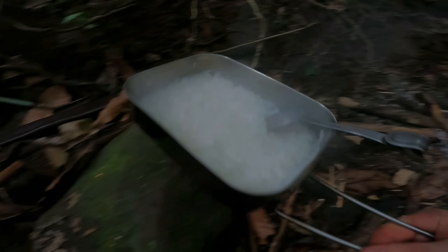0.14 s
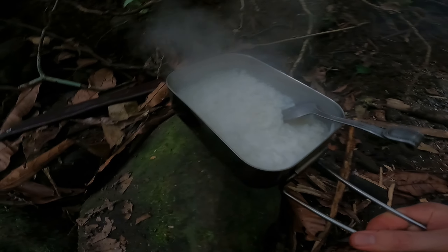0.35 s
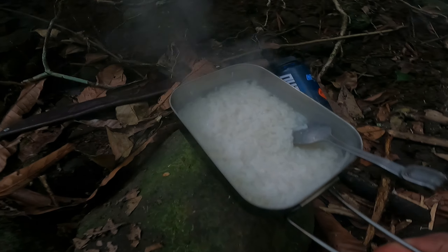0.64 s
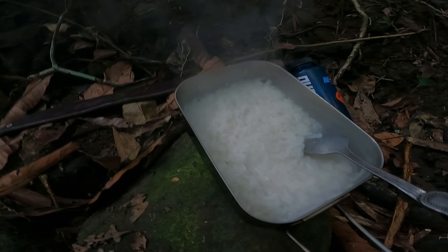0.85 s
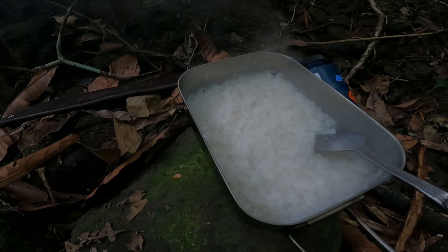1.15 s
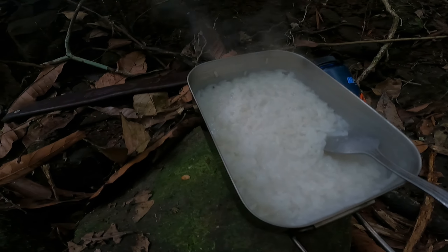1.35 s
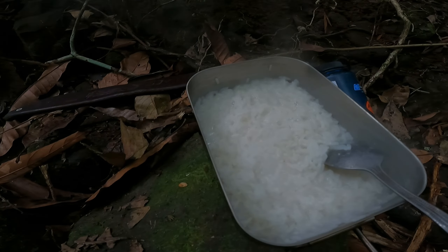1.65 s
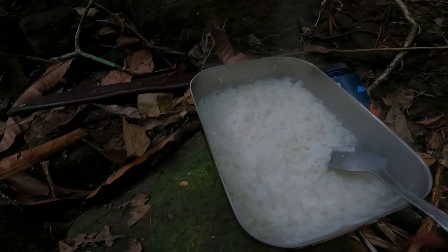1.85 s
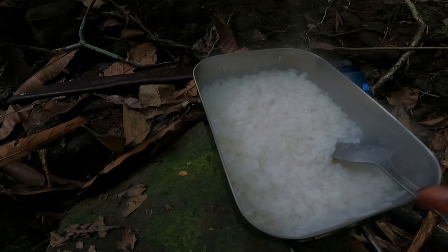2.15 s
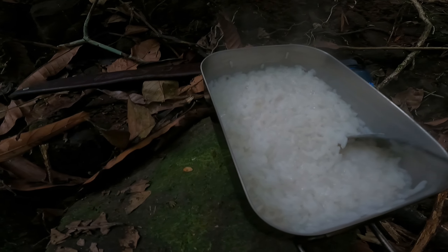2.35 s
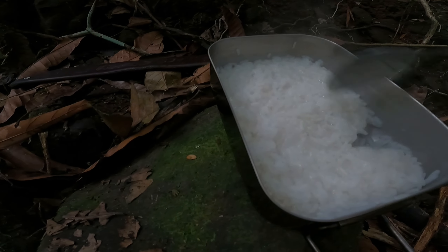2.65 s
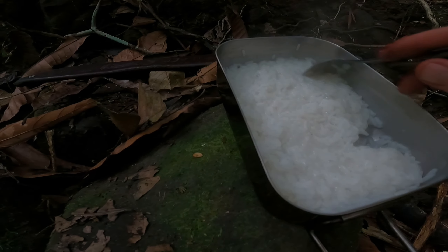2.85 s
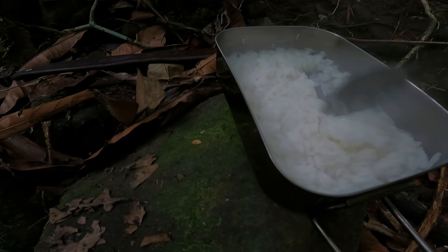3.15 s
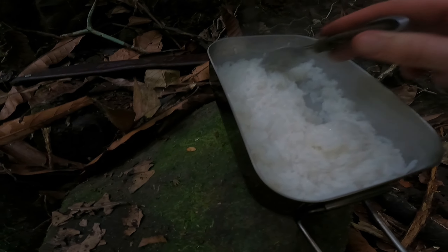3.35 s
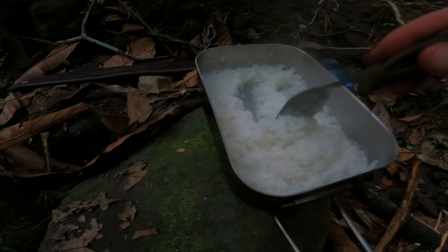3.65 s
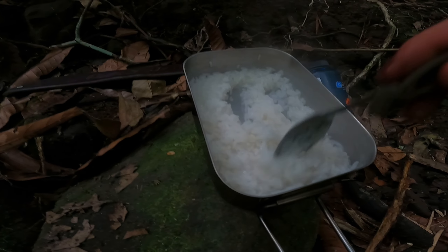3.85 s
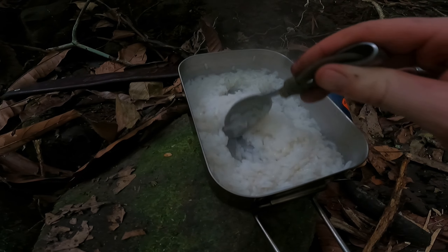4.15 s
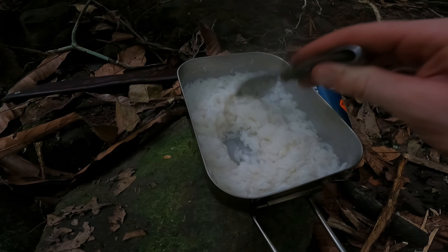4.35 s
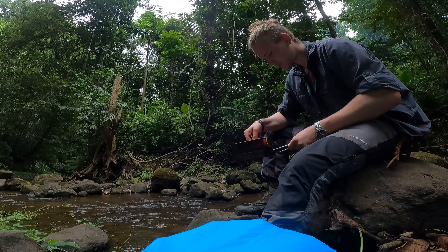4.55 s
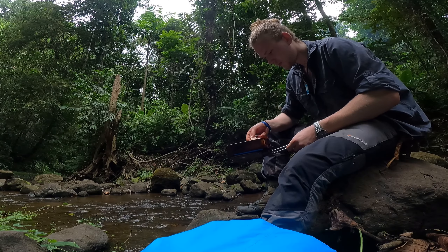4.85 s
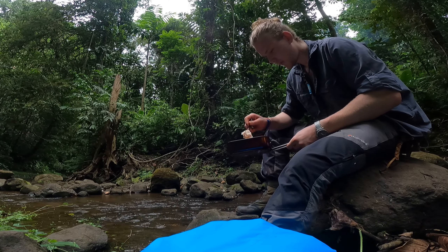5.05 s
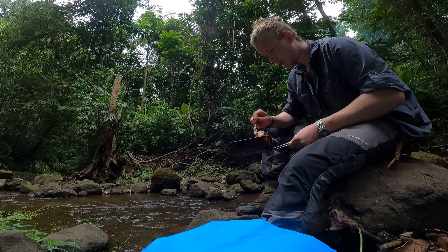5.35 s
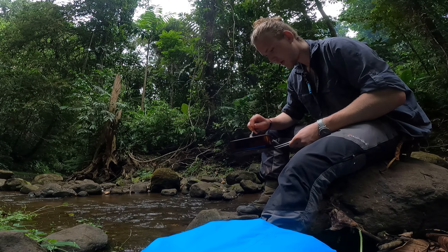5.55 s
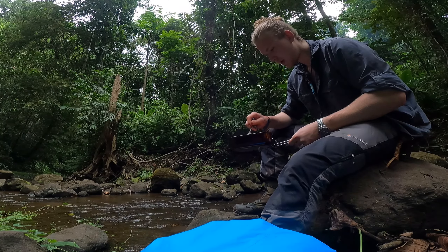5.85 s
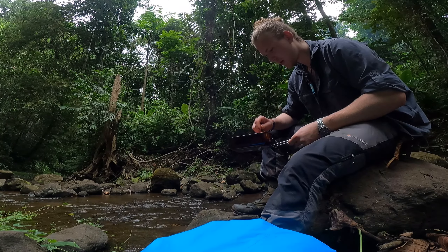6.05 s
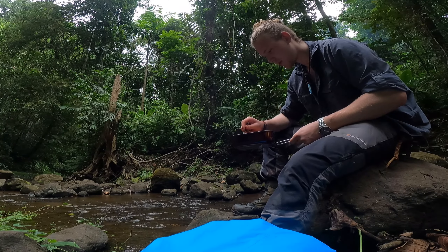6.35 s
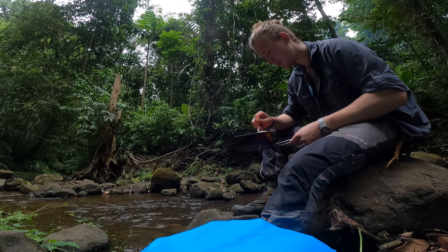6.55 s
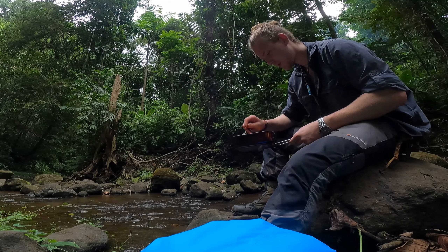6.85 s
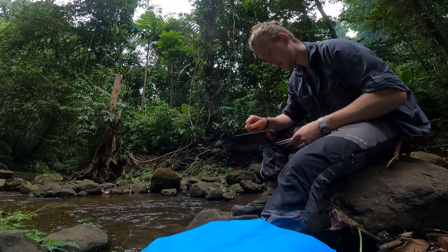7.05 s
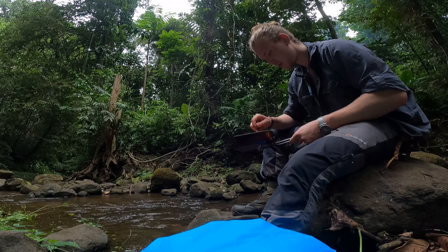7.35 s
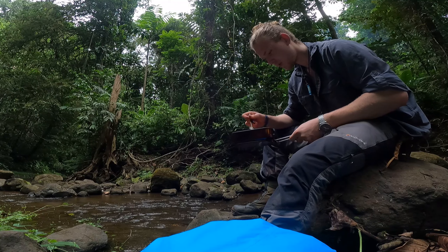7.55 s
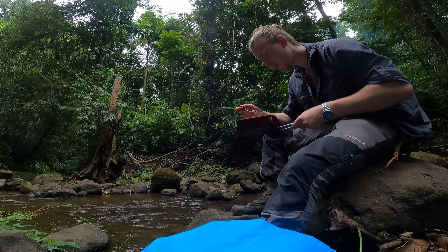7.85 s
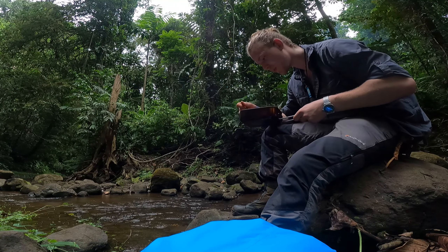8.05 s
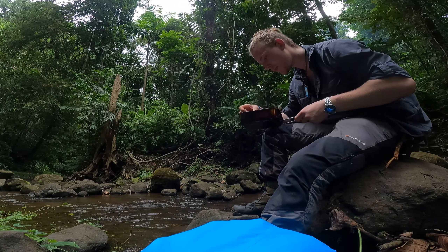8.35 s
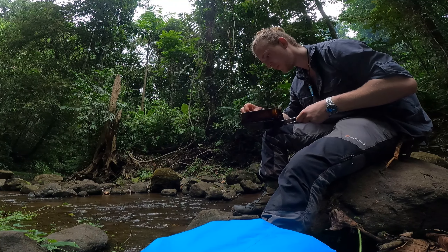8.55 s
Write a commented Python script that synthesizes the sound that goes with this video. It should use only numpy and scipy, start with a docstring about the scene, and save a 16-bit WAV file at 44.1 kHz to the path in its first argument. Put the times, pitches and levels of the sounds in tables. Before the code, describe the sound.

A spoon taps and scrapes through rice in a metal tin, over buzzing rainforest insects and later a softly bubbling brook.

```python
"""A rainforest, heard first from close by, then from across a brook. A spoon taps and scrapes through
rice in a hand-held metal tin: blows and small slips ring the tin's modes, and close by the hand passes
on a rumble. Insects buzz in a chorus, one rasps in bursts, a cricket throbs and a bird whistles, all as
noise in narrow resonances. Bubbles ring in the brook over a wash of leaves, water and far insects."""
import sys
import numpy as np
from scipy import signal
from scipy.io import wavfile
from scipy.ndimage import uniform_filter1d

SR = 44100
rng = np.random.default_rng(int(sys.argv[2]) if len(sys.argv) > 2 else 0)


def waveform_to_disk(signal):
    """Save audio, clipped to [-1, 1], as 16-bit WAV at the path in sys.argv[1]."""
    frames = np.transpose(np.atleast_2d(signal))
    scaled = np.clip(frames, -1, 1) * 32767
    samples = np.round(scaled).astype(np.int16)
    wavfile.write(sys.argv[1], SR, samples)


N = 384111
MOVE_S = 4.54  # close place to distant place

# Each row: start in seconds, clank peak in dB, favoured pitch in Hz, brightness in dB per octave,
# thud level in dB, chatter decay in seconds, base ring T60 in seconds.
SPOON_TAPS = [(0.025, -33, 5500, 13, -59, 0.0027, .04), (0.042, -31.5, 5500, 16, -57, 0.0036, .04),
              (0.076, -38, 5800, 6, -66, 0.0028, .04), (0.1214, -32, 1500, 9, -58, 0.0037, 0.12),
              (0.2297, -38, 2110, -3, -66, 0.0029, .06), (0.407, -25, 750, -10, -46, 0.0031, 0.047),
              (0.644, -39, 1100, 3, -64, .003, .04), (0.6737, -19.5, 497, -10, -39, 0.004, 0.092),
              (0.6824, -14, 4100, -1.5, -40.5, 0.0076, 0.11),
              (0.8243, -15.5, 690, -21.5, -31, 0.0086, 0.035),
              (0.859, -16.5, 4270, -12, -40.5, 0.0066, 0.069),
              (1.188, -35.5, 1360, -14, -55.5, 0.0072, 0.066),
              (1.2085, -23.5, 1920, -13, -62, 0.0044, 0.074), (1.3602, -33, 590, -10, -45, 0.011, .05),
              (1.6228, -25.5, 1820, -8, -42, 0.0072, 0.064),
              (1.6513, -27.5, 1950, -16.5, -46, 0.0087, 0.062),
              (1.7405, -36.5, 500, -19, -45.5, 0.0033, .05), (1.796, -54, 500, -5, -56, 0.0036, .04),
              (2.102, -39.5, 2000, 22, -84, 0.0023, 0.033), (2.2395, -15, 4300, -0.5, -46.5, 0.0093, 0.2),
              (2.2929, -27, 1290, 2, -59, 0.0092, 0.044), (2.4501, -18.5, 1300, 10.5, -51, 0.0095, 0.11),
              (2.9275, -15, 1000, -4, -35.5, 0.01, 0.07), (2.9835, -29, 614, -6, -64, .003, .04),
              (3.472, -6.5, 950, -1.5, -36, 0.0052, .05), (3.618, -20.5, 1330, 3, -66, 0.011, 0.071),
              (3.742, -31.5, 594, -25, -56, 0.0062, 0.028), (3.7779, -30.5, 503, -6, -41, 0.003, 0.081),
              (3.851, -27.5, 1830, 6.5, -70, .003, 0.045), (3.9028, -43, 515, -12, -46.5, 0.018, 0.02),
              (4.059, -8.5, 630, -0.5, -28.5, 0.0026, 0.044), (4.4992, -6, 2440, 5.5, -42, .003, 0.062),
              (4.7036, -13.5, 1250, 0, -52, 0.0045, 0.19), (4.865, -30, 1230, 3.5, -72, 0.0063, 0.12),
              (5.3414, -7.5, 1030, -2, -32.5, 0.0049, .14), (5.5699, -10, 996, 6, -35, 0.0089, 0.042),
              (5.6497, -26, 696, -17, -41, 0.0068, 0.026), (5.6567, -24, 690, -4, -49, 0.0049, 0.11),
              (5.719, -31.5, 715, -10, -50, 0.0084, 0.044), (5.928, -22, 960, -1.5, -48, 0.0052, 0.031),
              (6.1681, -15.5, 1070, -4.5, -59, 0.0087, 0.15)]
# Each row: frequency in Hz, level in dB, multiple of the base T60.
TIN_MODES = [(215, -23, 0.47), (302, -25, 0.43), (474, -2.5, 1.4), (647, 3, 1.68), (1007, -5.5, 0.57),
             (1040, 8.5, 1.18), (1303, 19.5, 0.4), (1670, 8, 1.1), (1927, 18, 0.64), (2283, 11.5, 0.4),
             (2560, 20, 0.28), (3130, 13.5, 0.27), (3690, 15.5, 0.26), (4285, 8.5, 0.39), (5260, 6.5, 0.36),
             (5840, -6, 0.76), (6390, -15, 2), (10500, -17, 0.12)]
# Each row: start, length, rise and fade in seconds, hold level in dB, favoured pitch in Hz,
# brightness in dB per octave.
SPOON_STROKES = [(0.0, 0.39, 0.0016, 0.39, -50.5, 1220, -6), (0.867, .23, 0.099, 0.095, -48.5, 650, -14),
                 (1.239, 0.19, 0.029, 0.046, -51, 400, -13.5), (1.737, 0.087, 0.0045, .08, -51, 413, -28),
                 (2.444, 0.11, 0.0044, 0.041, -43.5, 1470, -0.5),
                 (2.962, 0.22, 0.054, 0.032, -37.5, 2750, 11), (3.499, .197, .1, 0.0091, -39, 1620, 13.5),
                 (3.724, 0.076, 0.041, 0.021, -41, 500, -12), (4.091, 0.16, 0.065, 0.023, -40.5, 2640, 12),
                 (4.547, 0.18, 0.0066, 0.042, -48.5, 2480, 18.5),
                 (4.718, 0.16, 0.066, 0.07, -46.5, 1110, -4)]
# Each row: time in seconds, chorus level in dB.
CHORUS_LEVELS = [(0.0, -61), (4.51, -53), (4.7, -50), (8.71, -47.5)]
# Each row: centre in Hz, width in Hz, relative level in dB.
CHORUS_RESONANCES = [(5863, 430, 0), (6510, 1800, -4), (7330, 540, -1), (7610, 67, -6)]
# Each row: start in seconds, level in dB, nominal length in seconds.
RASP_BURSTS = [(0.504, -56.5, 0.41), (1.02, -57, 0.41), (1.714, -55, 0.63), (2.247, -53.5, 0.49),
               (3.095, -49.5, 0.38), (3.661, -50.5, 0.37), (4.359, -51, 0.16), (4.775, -49, 0.38),
               (7.926, -49, 0.38)]
# Each row: centre in Hz, width in Hz, relative level in dB, entry delay in seconds.
CLOSE_RASP_RESONANCES = [(8027, 98, -2.5, 0), (8420, 230, -4.5, 0.05), (10720, 552, -16.5, 0),
                         (11900, 690, -18.5, 0.053), (12950, 1200, -28, 0.016)]
DISTANT_RASP_RESONANCES = [(7340, 760, 8, 0.021), (8130, 530, -4, 0), (9900, 730, -3.5, 0.017),
                           (11500, 1300, -17.5, 0), (13500, 1100, -23, 0.014)]
# Each row: start in seconds, initial pitch in Hz, level in dB, length in seconds, sag limit as a share.
BIRD_CALLS = [(5.74, 2527, -51, 0.22, 0.13), (6.62, 2654, -48.5, 0.35, 0.25), (7.36, 1604, -52, .2, 0.17),
              (7.63, 2490, -59, 0.28, 0.25)]
# Each row: start in seconds, pitch in Hz, level in dB, length in seconds.
CLOSE_PEEPS = [(0.27, 4350, -75, .1), (0.565, 4450, -78, .07), (.86, 3400, -73, 0.32),
               (1.128, 4430, -69, 0.055), (1.283, 3030, -67.5, .35), (1.833, 4460, -64, 0.052),
               (2.849, 2210, -64, 0.072), (3.41, 2290, -64.5, 0.08), (3.957, 2260, -77, .09),
               (4.068, 2240, -51, 0.064), (4.325, 2230, -72, 0.079)]
# Each row: delay in seconds, gain in dB.
TREE_ECHOES = [(.05, -11.5), (.11, -9.5), (.18, -12)]
# Each row: start in seconds, level in dB, initial pitch in Hz.
LOUD_BUBBLES = [(5.081, -47, 2620), (6.119, -50, 975), (6.394, -47, 1350), (6.851, -51, 665),
                (7.169, -46.5, 1230), (7.75, -48.5, 1460), (8.316, -51, 1063), (8.427, -46.5, 1390),
                (8.633, -48, 973)]
# Each row: start in seconds, initial pitch in Hz, level in dB, decay time in seconds.
LOW_BUMPS = [(4.505, 227, -38.5, 0.027), (5.66, 136, -38, 0.058)]
# Each row: centre in seconds, level in dB, half-width in seconds.
HISS_SWELLS = [(1.395, -63.5, 0.088), (2.73, -62.5, 0.12)]
# Each row: frequency in Hz, relative spectral density of the forest in dB.
CLOSE_SPECTRUM = [(40, -43), (105, -56), (150, 0), (364, -14), (785, -20), (1200, -5.5), (4400, -13.5),
                  (7800, -14.5), (8600, -27.5), (12500, -45.5), (15500, -80)]
DISTANT_SPECTRUM = [(30, -12), (105, -64), (150, -3.5), (778, -10.5), (1200, -2.5), (3400, -6.5),
                    (5200, -9.5), (7800, -7.5), (8300, -23.5), (12500, -33), (15500, -63)]
# Each row: frequency in Hz, left-right correlation of the forest.
CLOSE_CORRELATION = [(60, 0.078), (240, 0.84), (950, 0.69), (3770, 0.98), (15000, 0.73)]
DISTANT_CORRELATION = [(60, 0.28), (240, 0.87), (950, 0.77), (3770, 0.46), (15000, 0.67)]
# Each row: frequency in Hz, forest level left over right in dB.
CLOSE_BALANCE = [(150, -2.5), (1000, 1.2), (12000, 4)]
DISTANT_BALANCE = [(150, -1.5), (1000, 0.61), (12000, 2.4)]


def tin_ring(t60_s, pitch_hz, bright_db, size, knock_db, spread_db, under_db, detune):
    """The tin after one click: dry knock, then weaker ring. The spot struck varies each mode."""
    hz, db, t60_scale = np.transpose(TIN_MODES)[:, :, None]
    t = np.arange(size) / SR
    spot = rng.standard_normal((len(TIN_MODES), 2))
    octaves = np.log2(hz / pitch_hz)
    favour_db = 7.5 * np.exp(-(octaves / .2) ** 2)  # counts twice in the ring
    db = db + bright_db * octaves + under_db * np.minimum(octaves, 0) + favour_db
    decay_db = 60 * t / (t60_s * t60_scale)
    fade = gain_of(favour_db - decay_db) + gain_of(knock_db - decay_db / 0.17)
    modes = np.sin(2 * np.pi * hz * (1 + detune * spot[:, 1:]) * t)
    return (gain_of(db + spread_db * spot[:, :1]) * fade * modes).sum(0)


def spoon_taps():
    """Each blow, a click plus brief contact chatter, rings the tin."""
    out, t = np.zeros((2, N)), np.arange(2000) / SR
    thud_hz, clank_hz = (110, 450), (450, 12500)
    for start_s, peak_db, pitch_hz, bright_db, thud_db, chatter_s, t60_s in SPOON_TAPS:
        force = 0.033 * rng.standard_normal((2, len(t))) ** 3 * np.exp(-t / chatter_s)
        force[1] = 0.74 * force[0] + 0.42 * force[1]
        force[:, 0] = 1  # the click
        ring = tin_ring(t60_s, pitch_hz, bright_db, size=6000,
                        knock_db=15.5, spread_db=4.5, under_db=4.5, detune=0.016)
        blow = signal.fftconvolve(force, ring[None], axes=1)
        clank, thud = band(blow, clank_hz), band(band(blow, thud_hz), thud_hz)
        clank *= gain_of(peak_db) / abs(clank).max()
        thud *= gain_of(thud_db) / thud[:, :900].std()
        add(out, start_s, clank + thud, pan_db=-2.2)
    return out


def rice_grit(size, pitch_hz, bright_db):
    """Clumped slips as the spoon passes six spots on the tin, each with its own colour."""
    wander = uniform_filter1d(rng.standard_normal((6, size)), size=1200)
    contact = gain_of(6.2 * unit_rms(uniform_filter1d(wander, size=1200)))
    out = 0
    for share in contact / np.linalg.norm(contact, axis=0):
        clumps_db = 4.56 * slow_noise(size, span=300)
        slips = rng.standard_normal((2, size)) * share
        slips *= gain_of(clumps_db + 2.4 * rng.exponential(1, size))
        slips[1] = 0.95 * slips[0] + 0.26 * slips[1]
        ring = tin_ring(0.053, pitch_hz * 2 ** rng.normal(0, 0.46), bright_db, size=2500,
                        knock_db=3.0, spread_db=8, under_db=2.5, detune=0.116)
        out = out + signal.fftconvolve(slips, ring[None] / np.linalg.norm(ring), axes=1)[:, :size]
    return out


def spoon_strokes():
    """The spoon drags through rice along the damped tin: rise, hold, release."""
    out, slack_db = np.zeros((2, N)), -11
    for start_s, length_s, rise_s, fade_s, db, pitch_hz, bright_db in SPOON_STROKES:
        t = np.arange(0, length_s, 1 / SR)
        slack = np.maximum(1 - t / rise_s, 0) + np.maximum(1 - (length_s - t) / fade_s, 0)
        drag = unit_rms(rice_grit(len(t), pitch_hz, bright_db)) * signal.windows.tukey(len(t), .04)
        add(out, start_s, gain_of(db + slack_db * slack) * drag, pan_db=-1.6)
    return out


def hand_rumble():
    """The hand shakes the close microphone and passes on each thud as a deep jolt."""
    t = np.arange(N) / SR
    jolt_db, jolt_s = -13, 0.033
    level = gain_of(-83.5 + 6.5 * slow_noise(N, span=5000))
    for start_s, _, _, _, thud_db, _, _ in SPOON_TAPS:
        first = round(start_s * SR)
        age_s = t[first:first + 8000] - start_s
        level[first:first + 8000] += gain_of(thud_db + jolt_db) * np.exp(-age_s / jolt_s)
    return level * unit_rms(band(band(stereo_noise(.9), (14, 55)), (14, 65)))


def insect_chorus(distant):
    """Clicks of many insects blur into a few noise bands."""
    buzz = sum(gain_of(db) * unit_rms(resonate(stereo_noise(0.69), hz, width_hz))
               for hz, width_hz, db in CHORUS_RESONANCES)
    buzz = signal.sosfilt(signal.ellip(6, 1, 40, (5600, 7950), "band", fs=SR, output="sos"), buzz)
    level_db = np.interp(np.arange(N) / SR, *np.transpose(CHORUS_LEVELS))
    pan_db = np.where(distant > .5, 3.2, 1.5)
    return gain_of(level_db + np.array([pan_db, -pan_db]) / 2) * unit_rms(buzz)


def insect_rasps(bursts, resonances, rise_s, pan_db, glide, glide_s):
    """One insect in bursts: resonances enter in turn, glide to pitch and trail off."""
    out, throb_hz = np.zeros((2, N)), 90
    for start_s, burst_db, length_s in bursts:
        t = np.arange(0, 2 * length_s, 1 / SR)
        throb = 1 + 0.12 * np.sin(2 * np.pi * (throb_hz * t + rng.random()))
        fade = np.exp(-(t / (0.42 * length_s)) ** 1.37)
        for hz, width_hz, db, entry_s in resonances:
            age_s = np.maximum(t - entry_s, 0)
            swell = gain_of(burst_db + db) * (1 - np.exp(-(age_s / rise_s) ** 2)) * fade
            pitch_hz = hz * (1 + glide * np.exp(-age_s / glide_s))
            direct, echo = resonate(rng.standard_normal((2, len(t))) * throb, pitch_hz, width_hz)
            add(out, start_s, swell * unit_rms(direct), pan_db)
            add(out, start_s, gain_of(-8) * swell * unit_rms(echo), pan_db=-14)  # trees on the right
    return out


def whistles(calls, width_hz, fade_db):
    """Near-sines, held or sagging in pitch, blurred and echoed by trees."""
    out, sag_s = np.zeros((2, N)), 0.199
    for start_s, hz, db, length_s, sag in calls:
        t = np.arange(0, length_s, 1 / SR)
        pitch_hz = hz * (1 - sag * (1 - np.exp(-t / sag_s)))
        direct, echo = resonate(rng.standard_normal((2, len(t))), pitch_hz, width_hz)
        swell = gain_of(db + fade_db * t / length_s) * signal.windows.tukey(len(t), .4)
        add(out, start_s, swell * unit_rms(direct), pan_db=1.5)
        for delay_s, echo_db in TREE_ECHOES:
            add(out, start_s + delay_s, gain_of(echo_db) * swell * unit_rms(echo), pan_db=-4)
    return out


def cricket():
    """A fuzzy tone in slightly uneven throbs."""
    t = np.arange(N) / SR
    throb_hz, phase_zero_s = 7.5, 4.6
    drift = slow_noise(N, span=6000)
    throb = 1 + 0.42 * np.cos(2 * np.pi * throb_hz * (t - phase_zero_s) + .5 * drift)
    tone = unit_rms(resonate(stereo_noise(0.68), hz=3990, width_hz=390))
    return gain_of(-58 + 1.2 * drift) * throb * tone


def bubble(hz, cycles):
    """A soft-edged tone that rises as the bubble nears the surface."""
    turns = np.arange(0, 3 * cycles, hz / SR)
    swell = 2 * (turns / cycles) * np.exp(1 - 1.58 * turns / cycles)
    return swell * np.sin(2 * np.pi * (turns + 0.0022 * turns ** 2))


def brook():
    """Small random bubbles plus a few loud ones."""
    out, rate_per_s = np.zeros((2, N)), 14
    for hz in np.geomspace(550, 2600, 16):
        levels = gain_of(-71 + 4.24 * np.minimum(rng.exponential(1, N), 3.5))
        onsets = rng.random(N) < rate_per_s / SR
        add(out, 0, signal.oaconvolve(levels * onsets, bubble(hz, cycles=3.9))[:N], pan_db=1.5)
    for start_s, db, hz in LOUD_BUBBLES:
        add(out, start_s, gain_of(db) * bubble(hz, cycles=12.7), pan_db=1.5)
    return out


def bumps():
    """Soft low tones that sink and die away."""
    out = np.zeros((2, N))
    for start_s, hz, db, decay_s in LOW_BUMPS:
        age = np.arange(0, 1.5, 1 / (SR * decay_s))
        swell = gain_of(db - 7.6 * age ** 2) * np.minimum(age / 0.055, 1)
        add(out, start_s, swell * np.sin(2 * np.pi * hz * decay_s * (age - 0.082 * age ** 2)))
    return out


def crackle():
    """Random ticks, thinning in the first second, over a growing hiss with brief swells."""
    t = np.arange(N) / SR
    rate_per_s, growth_db_per_s = 3 + 60 * np.exp(-t / .3), 3.5
    ticks = gain_of(-29.5 + 2.63 * rng.exponential(1, N)) * (rng.random(N) < rate_per_s / SR)
    swells = sum(gain_of(db) * np.exp(-((t - mid_s) / half_s) ** 2) for mid_s, db, half_s in HISS_SWELLS)
    hiss = unit_rms(band(stereo_noise(0.28), (2600, 7600)))
    hiss *= gain_of(-73 + growth_db_per_s * t) + swells
    return band(band(ticks, (500, 6500)), (400, 7500)) + hiss


def forest(spectrum, correlation, balance, level_db, patch_db):
    """Leaves, water and far insects: random short-time spectra with drifting patches."""
    frames, hz = N // 256 + 5, np.fft.rfftfreq(1024, 1 / SR)
    left_re, left_im, other_re, other_im, patches = rng.standard_normal((frames, 513, 5)).T
    patches = unit_rms(uniform_filter1d(uniform_filter1d(patches, size=10, axis=0), size=14, axis=1))
    alike, half_pan_db = curve_at(correlation, hz), curve_at(balance, hz) / 2
    left = left_re + 1j * left_im
    right = alike * left + np.sqrt(1 - alike ** 2) * (other_re + 1j * other_im)
    shape_db = curve_at(spectrum, hz) + patch_db * patches + np.array([half_pan_db, -half_pan_db])
    _, wash = signal.istft(np.array([left, right]) * gain_of(shape_db), nperseg=1024, noverlap=768)
    return gain_of(level_db) * unit_rms(wash[:, :N])


def gain_of(db):
    """Decibels to amplitude."""
    return 10 ** (np.asarray(db) / 20)


def unit_rms(x):
    """Scales to rms 1."""
    return x / np.sqrt(np.mean(x ** 2) + 1e-20)


def slow_noise(size, span):
    """Unit-rms noise averaged over span samples."""
    return unit_rms(uniform_filter1d(rng.standard_normal(size), size=span))


def stereo_noise(correlation):
    """Two correlated channels of white noise."""
    left, other = rng.standard_normal((2, N))
    return np.array([left, correlation * left + np.sqrt(1 - correlation ** 2) * other])


def curve_at(points, hz):
    """Log-frequency interpolation, as a column."""
    point_hz, values = np.transpose(points)
    return np.interp(np.log(hz + 1), np.log(point_hz + 1), values)[:, None]


def add(mix, start_s, sound, pan_db=0):
    """Mixes a sound in, louder on the left by pan_db."""
    part = mix[:, round(start_s * SR):][:, :sound.shape[-1]]
    part += sound[..., :part.shape[1]] * gain_of([[pan_db / 2], [-pan_db / 2]])


def band(x, edges_hz):
    """Causal band-pass."""
    return signal.sosfilt(signal.butter(2, edges_hz, "band", fs=SR, output="sos"), x)


def resonate(x, hz, width_hz):
    """Steep resonance: shift hz to zero, smooth twice, shift back."""
    carrier = np.exp(2j * np.pi * np.cumsum(hz * np.ones(x.shape[-1])) / SR)
    pole = np.exp(-np.pi * width_hz / SR)
    return 2 * (carrier * signal.lfilter([(1 - pole) ** 2], [1, -2 * pole, pole ** 2], x / carrier)).real


def scene():
    """Close place, then distant place; spoon and chorus run through both."""
    distant = np.clip((np.arange(N) / SR - MOVE_S) / 0.005, 0, 1)
    close = forest(CLOSE_SPECTRUM, CLOSE_CORRELATION, CLOSE_BALANCE, level_db=-60.5, patch_db=3.5)
    close += crackle() + hand_rumble()
    close += insect_rasps([burst for burst in RASP_BURSTS if burst[0] < MOVE_S], CLOSE_RASP_RESONANCES,
                          rise_s=0.015, pan_db=9.8, glide=-0.034, glide_s=0.033)
    close += whistles([(*peep, 0) for peep in CLOSE_PEEPS], width_hz=90, fade_db=-0.5)  # no sag
    far = forest(DISTANT_SPECTRUM, DISTANT_CORRELATION, DISTANT_BALANCE, level_db=-51, patch_db=2.5)
    far += cricket() + brook() + whistles(BIRD_CALLS, width_hz=87, fade_db=-3.0)
    far += insect_rasps([burst for burst in RASP_BURSTS if burst[0] > MOVE_S], DISTANT_RASP_RESONANCES,
                        rise_s=0.026, pan_db=9.4, glide=0.046, glide_s=0.036)
    # The tin radiates little deep bass or top treble.
    spoon = band(band(spoon_taps() + spoon_strokes(), (125, 14500)), (115, 15500))
    return spoon + insect_chorus(distant) + (1 - distant) * close + distant * far + bumps()


def record(dry):
    """Steep low-pass."""
    edge_hz = 15600
    return signal.oaconvolve(dry, signal.firwin(511, edge_hz, window=("kaiser", 9), fs=SR)[None], "same")


dry = scene()
out = record(dry)
waveform_to_disk(out)
```